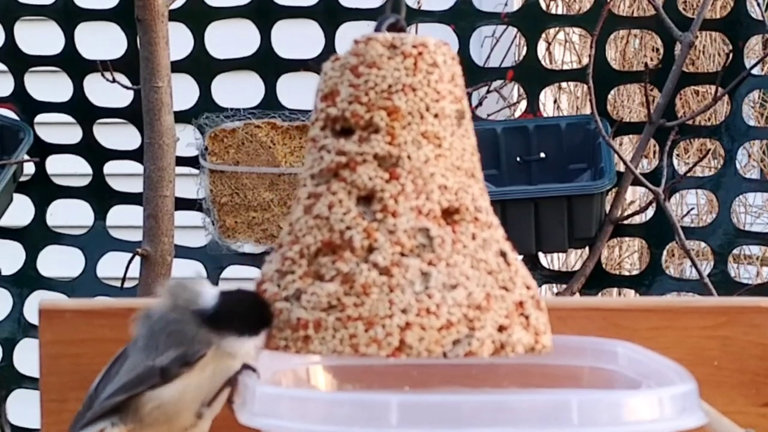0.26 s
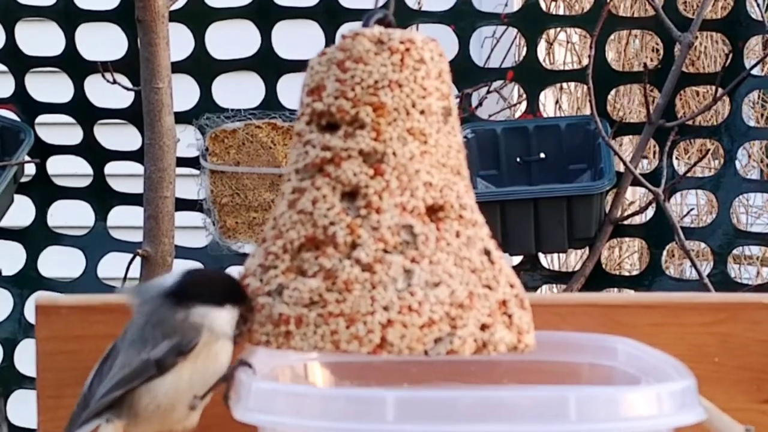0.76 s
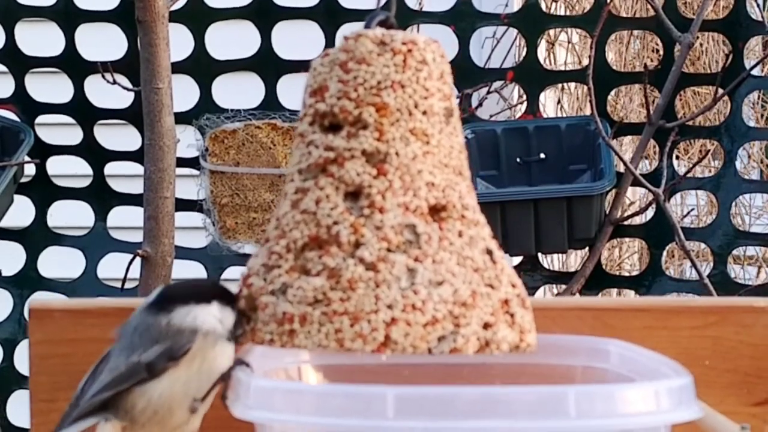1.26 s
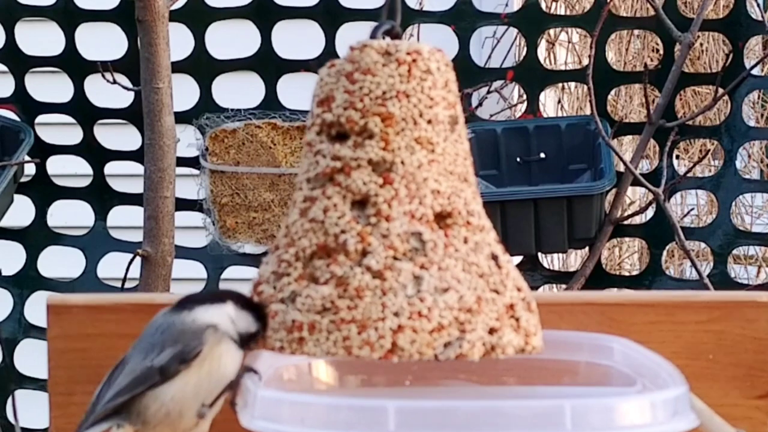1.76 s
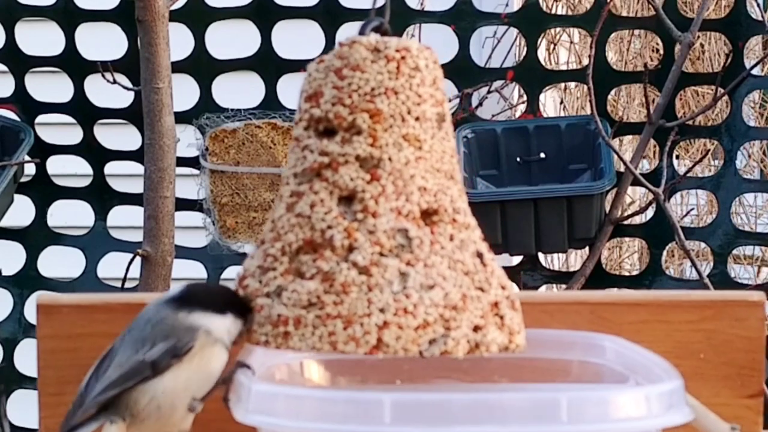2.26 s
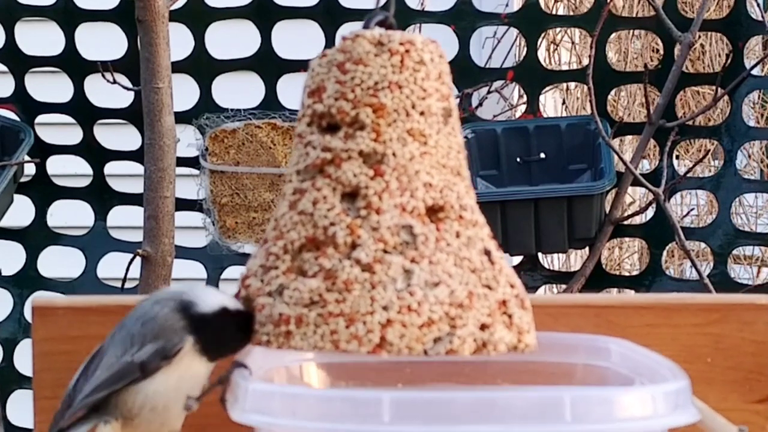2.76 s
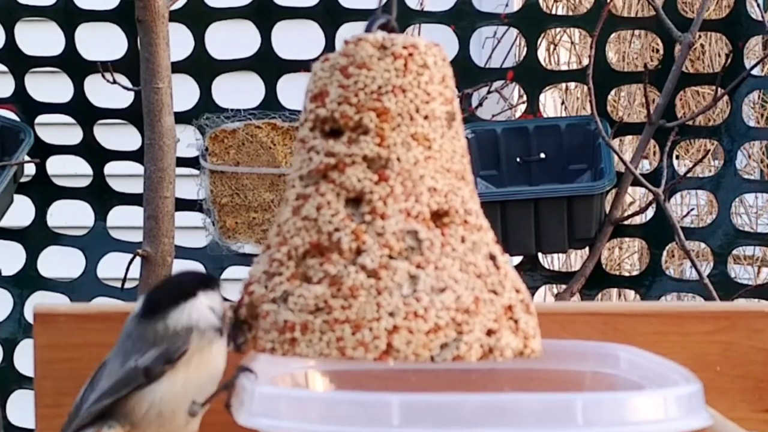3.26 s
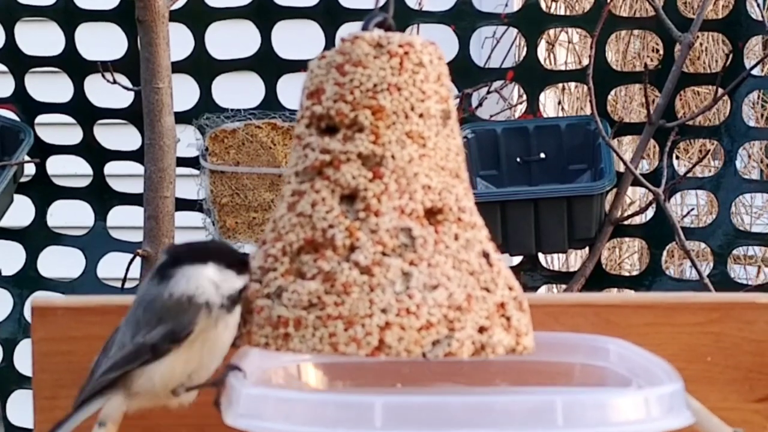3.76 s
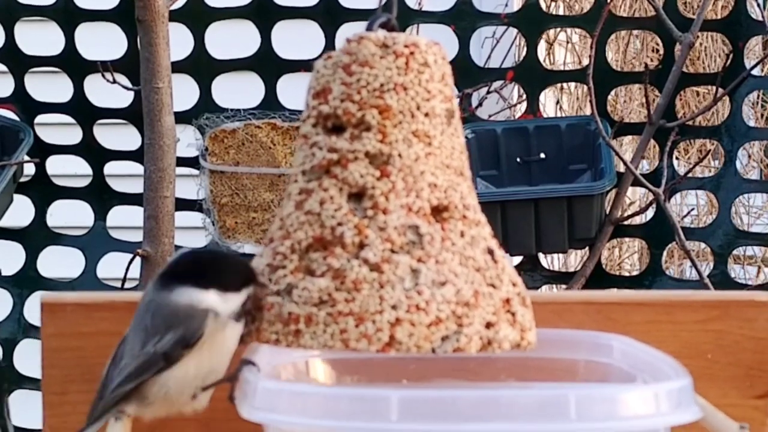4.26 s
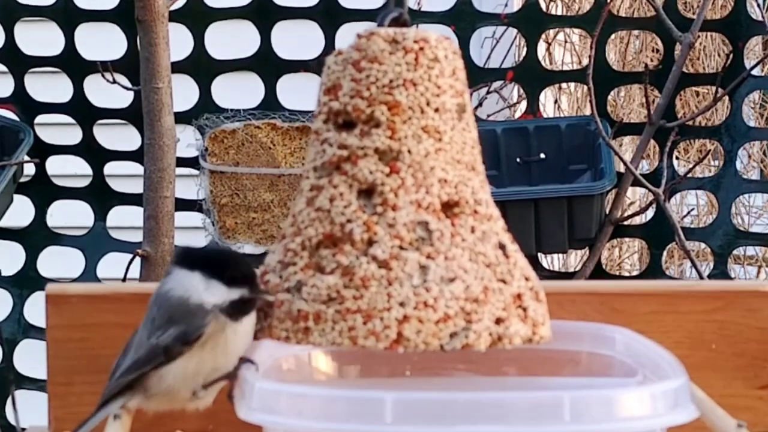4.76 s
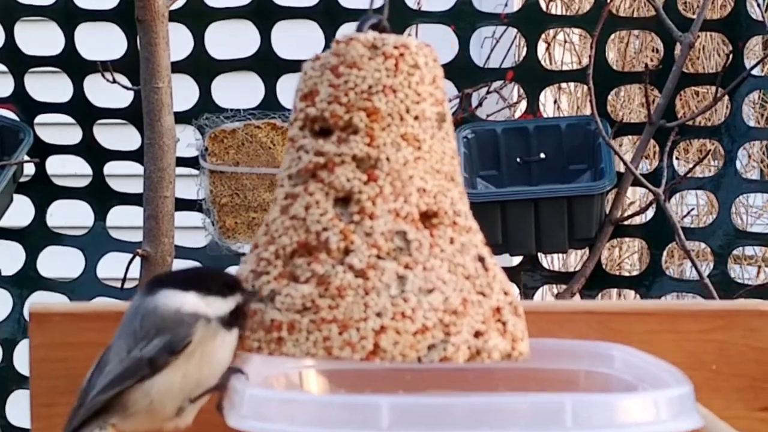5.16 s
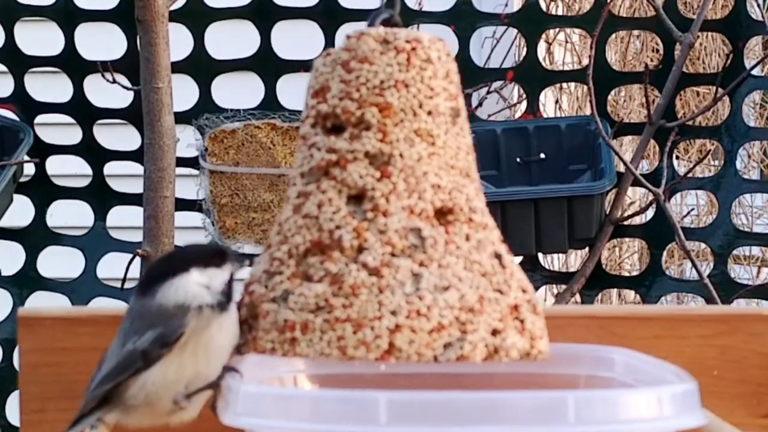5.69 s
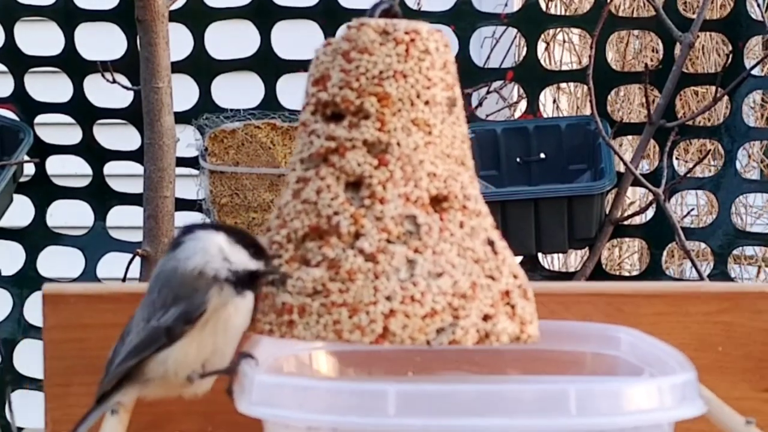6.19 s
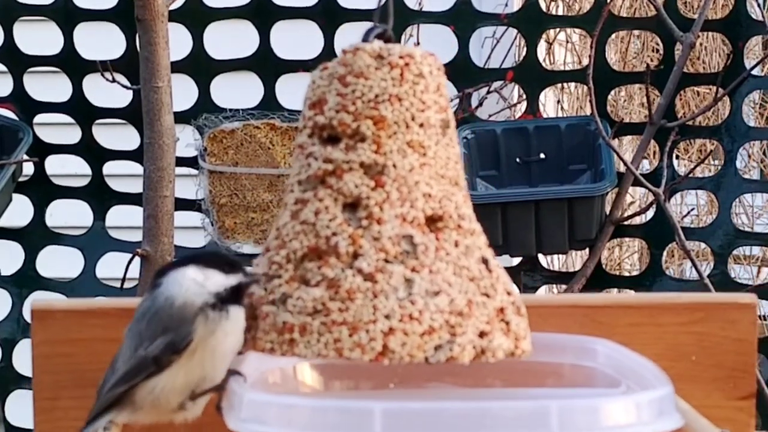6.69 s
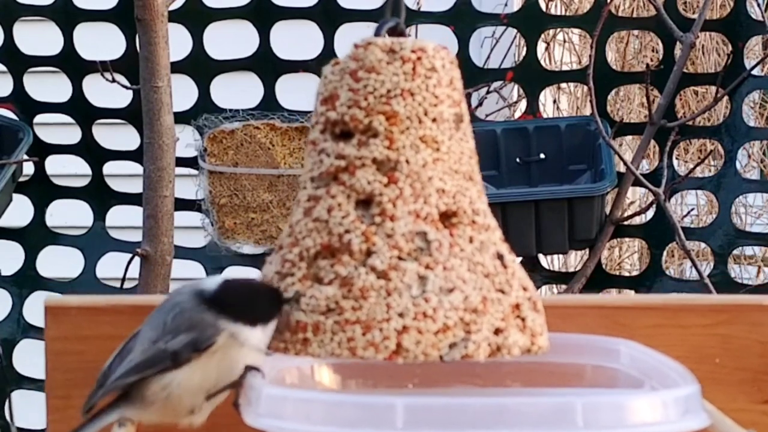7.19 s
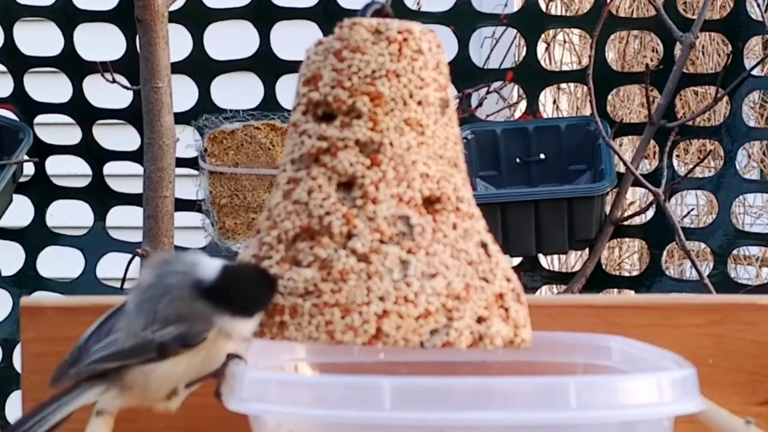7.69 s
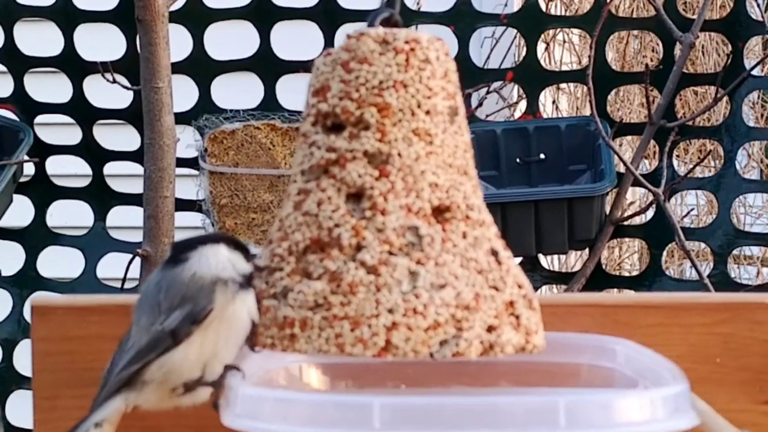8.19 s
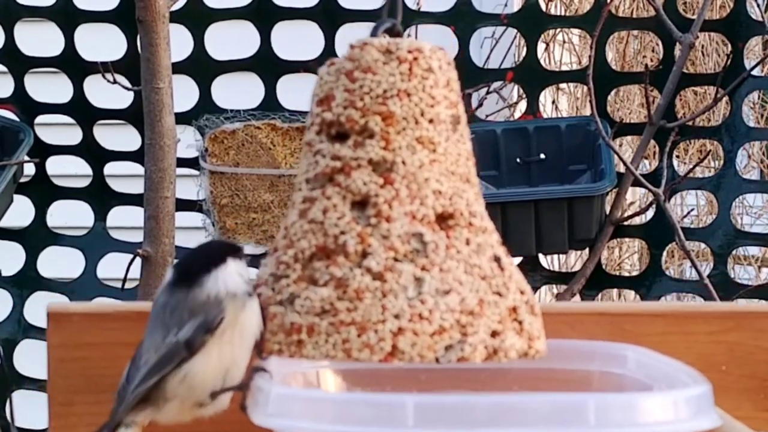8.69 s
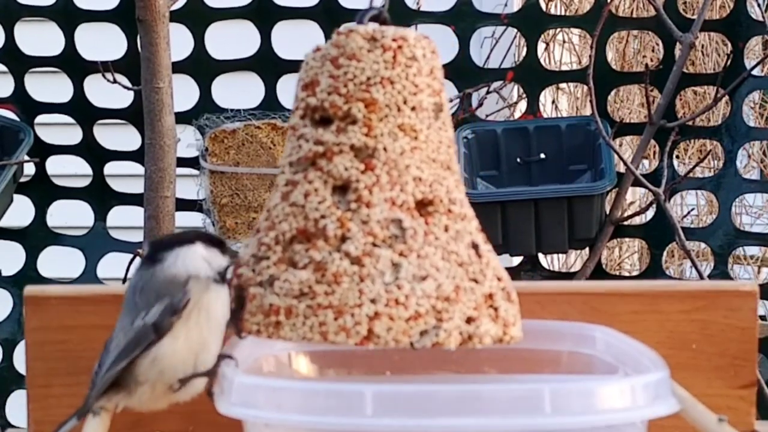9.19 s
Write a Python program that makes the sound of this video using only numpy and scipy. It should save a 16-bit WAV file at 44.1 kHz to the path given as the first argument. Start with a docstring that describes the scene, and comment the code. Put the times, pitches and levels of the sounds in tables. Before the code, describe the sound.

Chickadees call around a backyard feeder, lightly echoed by fence and walls, over a faint outdoor hush that dips whenever birds and wind go quiet. Wind bumps the microphone with soft low thumps from about 0.6 to 1.4 seconds, and more weakly near 4. Sharp, high chirps are scattered throughout, loudest near 0.9, 1.5, 4 and 5.1 seconds, among soft runs of quick falling notes. Farther birds whistle a falling two-note song, clearest at about 1.7, 4.8 and 7.7 seconds. Faint, hoarse, repeated notes sound in the distance near 1.6, 4 and 9 seconds. From about 6 seconds a beak gives a few tiny ticks on seed. Four loud downward sweeps come between 6.8 and 7.4 seconds. Three close calls follow at 7.5, 7.9 and 8.3 seconds, each a high whistle dropping into a buzz. A few thin whistles and chirps finish at around 9.4 seconds.

```python
"""Chickadees around a backyard feeder, echoed by fence and walls. First come far "fee-bee" songs, quick
falling notes and sharp, arched chirps, while wind nudges the microphone. Hoarse, distant "dee" notes
soon join in. From about 6 seconds a beak ticks on seed; then come three whistle-and-buzz calls, and
last a few whistles and chirps. All along, a noise gate (an automatic volume control) lowers the
outdoor hush whenever birds and wind go quiet."""
import sys
import numpy as np
from scipy import signal
from scipy.fft import rfft, irfft
from scipy.io import wavfile
from scipy.ndimage import uniform_filter1d, minimum_filter1d

SR = 44100
rng = np.random.default_rng(int(sys.argv[2]) if len(sys.argv) > 2 else 0)


def put_to_file(sound):
    """Save the sound as 16-bit audio at rate SR, in the file named by the first command-line argument."""
    columns = np.atleast_2d(sound).T  # one column per channel
    safe = np.clip(columns, -1, 1)
    whole_steps = np.round(safe * 32767)
    wavfile.write(sys.argv[1], SR, whole_steps.astype(np.int16))


N = 416744

# Whistle-and-buzz calls. Each row: start in seconds, whistle's last pitch in Hz, whistle level in dB,
# buzz centre pitch in Hz, warbles per second, roughness from 0 to 1, buzz level in dB.
BUZZ_CALLS = [(7.485, 7130, -33.5, 4927, 160, .4, -35), (7.892, 7010, -33.5, 4909, 166.4, .2, -29.5),
              (8.301, 6920, -31, 4771, 180, .2, -33.5)]


def undb(db):
    """Turn decibels into a number to multiply a sound by."""
    return 10 ** (np.asarray(db) / 20)


def unit(x):
    """Scale a sound so that its average strength (rms) is 1."""
    return x / np.sqrt(np.mean(x ** 2))


def walk(rate, size):
    """A smooth random wobble, roughly 1 in size, with about `rate` new values a second."""
    step = max(int(SR / rate), 2)
    held = np.repeat(rng.standard_normal(size // step + 1), step)
    return 1.866 * uniform_filter1d(uniform_filter1d(held, step), step)[:size]


def noise(points):
    """Noise whose lows and highs follow a list of (Hz, dB) points."""
    hz, db = np.transpose(points)
    freqs = np.maximum(np.arange(N // 2 + 1) * SR / N, 1)
    gain = undb(np.interp(np.log(freqs), np.log(hz), db))
    return unit(irfft(rfft(rng.standard_normal(N)) * gain, N))


def band(x, lo_hz, hi_hz):
    """Keep the part of a sound between two frequencies."""
    return signal.sosfilt(signal.butter(3, [lo_hz, hi_hz], "band", fs=SR, output="sos"), x)


def add(track, start, sound):
    """Mix a sound into the track at `start` seconds."""
    at = int(start * SR)
    sound = sound[..., max(-at, 0):max(N - at, 0)]
    track[..., max(at, 0):max(at, 0) + sound.shape[-1]] += sound


def progress(length_s):
    """A ramp from 0 to 1 over a note, called `u` below."""
    return np.linspace(0, 1, int(length_s * SR))


def fade(u, rise, fall):
    """Fade in and out smoothly; rise and fall are shares of the note's length."""
    fade_in = np.sin(np.pi / 2 * np.clip(u / rise, 0, 1)) ** 2
    fade_out = np.sin(np.pi / 2 * np.clip((1 - u) / fall, 0, 1)) ** 2
    return fade_in * fade_out


def glide(u, first_hz, last_hz):
    """A pitch that moves fast at first and then settles."""
    return last_hz + (first_hz - last_hz) * (1 - u) ** 2.2


def syrinx(hz, waver, flutter_db, rate, octave_db=-39):
    """A bird's voice box: a nearly pure tone, trembling in pitch and strength, with a faint octave."""
    phase = 2 * np.pi * np.cumsum(hz * (1 + waver * walk(rate, len(hz)))) / SR
    tone = np.sin(phase) + undb(octave_db) * np.sin(2 * phase)
    return np.sqrt(2) * tone * undb(flutter_db * walk(rate, len(hz)))


def placed(sound, db, near_db=-28, spread=.3245):
    """Direct sound and what reaches the walls: a faint bird is further off, so more of it is echo."""
    return np.outer(undb([db, db + spread * (near_db - db)]), sound)


def yard(sound, tail_db, tail_s, close_db, smear_s=.003):
    """Sound scatters off the feeder, echoes, then lingers as a thin tail from branches and walls."""
    # Echoes off fence and house. Each row: delay in seconds, level in dB.
    echoes = [(.031, -19.5), (0.067, -22)]
    direct, outward = sound
    t = np.arange(SR) / SR
    tail = rng.standard_normal(SR) * undb(-60 * t / tail_s)
    close = rng.standard_normal(SR) * np.exp(-t / .01306)
    response = undb(tail_db) * unit(tail) + undb(close_db) * unit(close)
    for delay, db in echoes:
        echo = unit(rng.standard_normal(SR) * np.exp(-t / smear_s))
        response += undb(db) * np.roll(echo, int(delay * SR))
    return direct + signal.fftconvolve(outward, response / np.sqrt(SR))[:N]


def hush():
    """Distant town noise that swells a little."""
    # The tone of the hush. Each row: frequency in Hz, relative level in dB.
    spectrum = [(25, -13), (60, 5.5), (110, 5.5), (180, 1.5), (300, -8), (500, -7.5), (650, -5),
                (900, -2.5), (1300, -11), (1600, -7), (2100, -13.5), (2550, -19), (4000, -20.5),
                (12000, -30), (14000, -37.5)]
    # Its slow swell. Each row: time in seconds, level in dB.
    levels = [(0, -61.5), (2.8, -61.5), (4.1, -58.5), (5.5, -60), (7.5, -60.5), (9.4, -60)]
    db = np.interp(np.arange(N) / SR, *np.transpose(levels))
    return noise(spectrum) * undb(db + .5 * walk(2.0664, N) + .907 * walk(20, N))


def wind(flutter_db=2.2):
    """Each gust builds, holds and dies away, rumbling unevenly on the microphone."""
    # Gusts. Each row: start in seconds, length in seconds, level in dB.
    gusts = [(.48, .09, -63), (.6, .2, -40.5), (.79, .17, -36.5), (.92, .34, -46.5), (1.25, .12, -45.5),
             (1.33, .65, -62), (1.67, .1, -52), (3.62, .17, -50), (3.79, .07, -54), (3.9, .08, -52),
             (4.25, .1, -56), (4.4, .65, -57), (4.95, .9, -63), (6, .45, -64)]
    # The tone of the rumble. Each row: frequency in Hz, relative level in dB.
    spectrum = [(12, -68), (20, -19), (103, 3), (174, -6), (330, -30.5), (409, -43), (492, -21.5),
                (600, -53), (780, -66), (1320, -120)]
    strength = np.zeros(N)
    for start, length, db in gusts:
        add(strength, start, undb(db) * fade(progress(length), rise=.3, fall=.45))
    return noise(spectrum) * strength * undb(flutter_db * walk(30, N))


def beak_ticks(decay_s=.0011):
    """A beak snaps against hard seed, making tiny bursts of bright noise."""
    # Pecks. Each row: start in seconds, relative level in dB.
    pecks = [(5.892, -52), (6.002, -51), (6.123, -45), (6.129, -47.5), (6.387, -56), (7.259, -39.5),
             (9.176, -50)]
    out = np.zeros(N)
    t = np.arange(SR // 40) / SR
    snap = np.exp(-t / decay_s)
    for start, db in pecks:
        add(out, start, undb(db) * snap * rng.standard_normal(len(t)))
    return 2 * band(out, 5500, 8780) + .47 * band(out, 1200, 13000)


def dee(hz, length_s=.14):
    """One hoarse "dee": a rough stack of overtones shaped by the throat."""
    # Where the throat rings. Each row: frequency in Hz, width in Hz, relative level in dB.
    throat = [(2524, 900, -4), (3471, 450, 2), (5265, 540, -3)]
    u = progress(length_s)
    wobble = 1 + .011 * walk(400, len(u)) + .015 * walk(20, len(u))
    phase = 2 * np.pi * np.cumsum(hz * wobble) / SR
    stack = 0
    for k in range(5, 16):
        gain = sum(undb(db) / (1 + ((k * hz - peak) / (width / 2)) ** 2) for peak, width, db in throat)
        flicker = undb(3.5 * walk(25, len(u)))
        stack += gain * flicker * np.sin(k * phase + rng.uniform(0, 2 * np.pi))
    return fade(u, rise=.12, fall=.178) * unit(stack)


def dee_series(every_s=.168, sag_hz=4.5):
    """Distant, evenly spaced dees, each a little lower than the last."""
    # Each row: start in seconds, number of dees, first pitch in Hz, relative level in dB.
    series = [(1.64, 5, 432, -62), (3.91, 7, 428, -58.5), (5.62, 7, 436, -73), (7.15, 2, 420, -59),
              (8.85, 4, 446, -60)]
    out = np.zeros((2, N))
    for start, count, hz, db in series:
        for k in range(count):
            add(out, start + k * every_s, placed(dee(hz - k * sag_hz), db))
    return out


def song_note(u, hz, swell_db):
    """A long whistle that swells, wavers a little and stops firmly."""
    tone = syrinx(hz, waver=.004, flutter_db=1.5, rate=40, octave_db=-48)
    return undb(swell_db * (u - 1) - 1.9) * fade(u, rise=.08, fall=.051) * tone


def songs(fee_s=.425, bee_s=.443, catch_at_s=.195, catch_width_s=.014):
    """Birds in the trees sing a falling "fee", then a lower "bee" in which the voice catches briefly."""
    # Songs. Each row: start in seconds, fee's last pitch in Hz, seconds from start to bee,
    # fee level in dB, bee level in dB.
    fee_bees = [(-.83, 3850, .5, -60, -61.5), (.5, 3850, .515, -59, -62), (1.66, 3630, .535, -45.5, -49.5),
                (3.6, 3780, .52, -64, -66), (4.758, 3620, .527, -45.5, -49), (7.73, 3640, .53, -46, -54.5)]
    out = np.zeros((2, N))
    for start, hz, bee_after, fee_db, bee_db in fee_bees:
        u = progress(fee_s)
        fee = song_note(u, glide(u, 1.08 * hz, hz), swell_db=5)
        add(out, start, placed(fee, fee_db))
        u = progress(bee_s)
        bee_hz = .89 * hz * (1 + .012 * (u - 1))  # a tone lower, rising very slightly
        catch = 1 - np.exp(-((u * bee_s - catch_at_s) / catch_width_s) ** 2)
        bee = catch * song_note(u, bee_hz, swell_db=1.5)
        add(out, start + bee_after, placed(bee, bee_db))
    return out


def falling_notes(length_s=.054, upper_db=-32):
    """Runs of quick downward sweeps; the other side of the voice box adds a faint higher tone."""
    # Runs. Each row: start in seconds, number of notes, first and later spacing in seconds,
    # middle pitch in Hz, first level in dB, change per note in dB.
    runs = [(.268, 3, .119, .124, 3350, -58, -2), (1.62, 2, .165, .165, 3150, -65, 3),
            (3.808, 4, .097, .109, 3340, -52, -.9), (4.268, 1, 0, 0, 3180, -56.5, 0),
            (6.467, 3, .131, .139, 3320, -53, -3.5), (6.805, 4, .205, .178, 3845, -26.3, 0),
            (8.245, 5, .116, .119, 3290, -50, 0)]
    out = np.zeros((2, N))
    u = progress(length_s)
    from_middle = u - .5
    for start, count, first_gap, gap, mid_hz, db, step_db in runs:
        hz = mid_hz * np.exp(-.33 * from_middle + .1192 * from_middle ** 2)
        width = np.interp(db, [-48, -28], [.5, .25])  # loud notes peak more sharply
        swell = fade(u, rise=.12, fall=.041) / (1 + (from_middle / width) ** 2) ** 2
        for k in range(count):
            tone = syrinx(hz, waver=.003, flutter_db=.7, rate=200, octave_db=-48)
            upper = syrinx(1.33 * hz, waver=.01, flutter_db=2, rate=200)
            voice = swell * (tone + undb(upper_db) * upper)
            at = start if k == 0 else start + first_gap + (k - 1) * gap
            add(out, at, placed(voice, db + k * step_db, spread=.31))
    return out


def whistle(length_s, first_hz, last_hz, db):
    """A short whistle that swells and dies; faint high ones are scratchy."""
    u = progress(length_s)
    waver = np.interp(db, [-58, -51], [.018 if last_hz > 5000 else .006, .003])
    tone = syrinx(glide(u, first_hz, last_hz), waver, flutter_db=1.5, rate=400, octave_db=-47)
    return placed(fade(u, rise=.4356, fall=.373) * tone, db)


def whistles(lead_s=.118, peep_start_s=7.15, peep_every_s=.173, peep_s=.062):
    """Single whistles, the whistle that leads into each buzz, and a far bird's four sinking peeps."""
    # Single whistles. Each row: start and length in seconds, first and last pitch in Hz, level in dB.
    singles = [(.68, .13, 7450, 7590, -68), (1.12, .34, 4268, 3400, -61.5), (2.37, .057, 8000, 7597, -62),
               (3.444, .02, 10500, 6000, -53), (4.787, .155, 8092, 7276, -58),
               (5.444, .17, 9300, 7900, -66), (6.71, .049, 9400, 7840, -64), (7.95, .4, 2755, 2769, -65),
               (8.258, .255, 8158, 7500, -53), (8.69, .156, 8380, 7850, -43.5),
               (8.838, .127, 7820, 7956, -54.5), (8.913, .046, 8020, 5710, -48),
               (8.964, .046, 3950, 3600, -48.5), (9.027, .086, 2377, 2620, -48.5)]
    out = np.zeros((2, N))
    for start, length, first_hz, last_hz, db in singles:
        add(out, start, whistle(length, first_hz, last_hz, db))
    for start, hz, db, *_ in BUZZ_CALLS:
        add(out, start, whistle(lead_s, 1.02 * hz, hz, db))
    for k in range(4):
        hz = 2690 - 65 * k
        add(out, peep_start_s + k * peep_every_s, whistle(peep_s, hz, hz, db=-60))
    return out


def buzzes(after_s=.099, length_s=.24, swing_hz=700, drop_hz=2000, drop_s=.022, low_db=-6, sag_hz=120):
    """The pitch drops from the whistle, then flips fast between a strong high tone and a reedy low one."""
    out = np.zeros((2, N))
    u = progress(length_s)
    for start, _, _, centre_hz, rate, rough, db in BUZZ_CALLS:
        cycle = 2 * np.pi * np.cumsum(rate * (1 + .1014 * rough * walk(149.7, len(u)))) / SR
        flip = np.tanh(2.2 * (np.cos(cycle) + .25))  # near +1 on the high tone, -1 on the low
        settling = np.exp(-u * length_s / drop_s)
        warble_hz = swing_hz * flip - sag_hz * np.sin(cycle)
        hz = centre_hz + drop_hz * settling + warble_hz * (1 - settling)
        tone = syrinx(hz, waver=.002 + .025 * rough, flutter_db=.4 + 2.5 * rough, rate=700,
                      octave_db=-28 - 9 * flip)
        pulse = (.197 + .619 * flip ** 2) * undb(low_db * (1 - flip) / 2)  # nearly stops at each flip
        swell = undb(np.interp(u, [0, .27, .52, 1], [-16, -1, -1, -9.5]))
        voice = 1.555 * pulse * swell * fade(u, rise=.041, fall=.061) * tone
        voice = band(voice, 3434, 6397) + .3 * voice  # the throat passes little outside this range
        add(out, start + after_s, placed(voice, db))
    return out


def chirps(scratch=.014, crack=.04, snap_db=14):
    """The pitch climbs, then plunges; soft chirps are scratchy, strong ones clear until they crack."""
    # Arched chirps. Each row: start in seconds, length in seconds, top pitch in Hz, level in dB.
    arches = [(-.02, .07, 7285, -50.5), (.908, .062, 7535, -31.5), (1.517, .048, 7838, -37),
              (2.285, .028, 7864, -55), (2.346, .045, 7645, -56), (2.827, .045, 8225, -51),
              (2.867, .039, 7830, -50), (2.948, .029, 6970, -58), (3.072, .035, 7030, -55.5),
              (3.16, .022, 6933, -56), (3.27, .042, 7900, -44), (3.539, .046, 7640, -42.5),
              (3.652, .038, 7104, -45), (3.735, .047, 6572, -53), (3.995, .068, 7552, -28),
              (4.372, .055, 6913, -43), (4.443, .06, 7756, -43), (5.108, .068, 7943, -42),
              (5.126, .047, 7459, -30.5), (5.817, .04, 7523, -58.5), (6.026, .06, 7560, -54.5),
              (6.155, .06, 7400, -58), (6.26, .041, 7430, -60.5), (6.346, .043, 6530, -60),
              (6.604, .029, 7623, -64), (6.966, .054, 7693, -53.5), (7.101, .039, 7750, -50),
              (7.62, .05, 8250, -51), (9.192, .042, 7560, -44), (9.365, .049, 7580, -51)]
    out = np.zeros((2, N))
    for start, length, top_hz, db in arches:
        u = progress(length)
        force = np.interp(db, [-52, -36], [0, 1])
        depth = np.interp(db, [-56, -40], [.14, .41])  # share of the pitch lost: more with effort
        climb = .125 * np.clip(1 - u / .62, 0, 1) ** 2
        plunge = np.clip((u - .68) / .32, 0, None) ** 2.2
        hz = top_hz * (1 - climb - depth * plunge)
        waver = .002 + scratch * (1 - force) + crack * force * plunge
        octave_db = -54 + force * (20 + snap_db * np.sqrt(plunge))
        tone = syrinx(hz, waver, flutter_db=2, rate=460, octave_db=octave_db)
        swell = undb(np.interp(u, [0, .38, .7, 1], [-12, 4.5, -.5, -13]))
        add(out, start, placed(swell * fade(u, rise=.057, fall=.047) * tone, db))
    return out


def scene():
    """Near and far birds in the yard, over wind and hush, in one channel."""
    near = yard(chirps(), tail_db=-18, tail_s=.672, close_db=-11)
    near += yard(falling_notes() + whistles(), tail_db=-15, tail_s=.792, close_db=-12)
    near += yard(buzzes(), tail_db=-17.5, tail_s=.78, close_db=-12)
    far = yard(songs(), tail_db=-18.5, tail_s=.96, close_db=-25)
    far += yard(dee_series(), tail_db=-11.5, tail_s=.945, close_db=-13.5) * undb(-5)
    return (near + far + beak_ticks() + wind() + hush())[None]


def record(dry, open_db=-61, knee_db=1.17, depth_db=13, hold_s=.00696, top_hz=15600):
    """A noise gate turns all sound down unless treble or rumble opens it; the highest treble is cut."""
    sensed = band(dry[0], 2960, 15000) + .3 * band(dry[0], 40, 250)
    level_db = 10 * np.log10(np.abs(uniform_filter1d(sensed ** 2, SR // 100)) + 1e-12)
    held_db = -minimum_filter1d(-level_db, int(hold_s * SR))  # the loudest level nearby
    shut = .5 - .5 * np.tanh((held_db - open_db) / knee_db / 2)  # 0 is open, 1 is shut
    gated = dry * undb(-depth_db * uniform_filter1d(shut, SR // 150))
    return signal.sosfilt(signal.ellip(8, .2, 70, top_hz, fs=SR, output="sos"), gated)


dry = scene()
out = record(dry)
put_to_file(out)
```